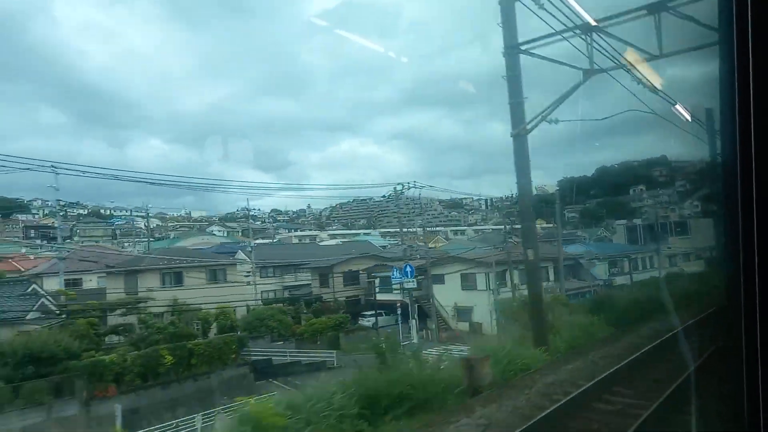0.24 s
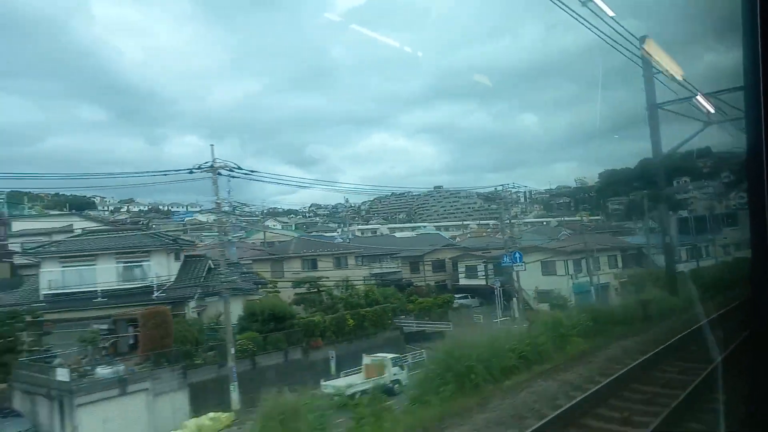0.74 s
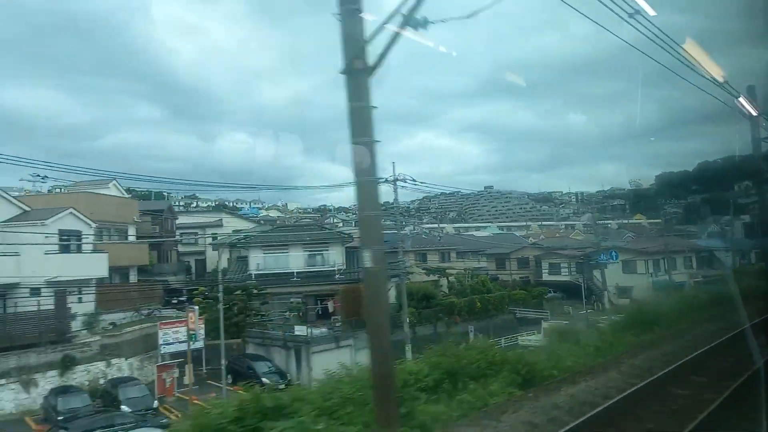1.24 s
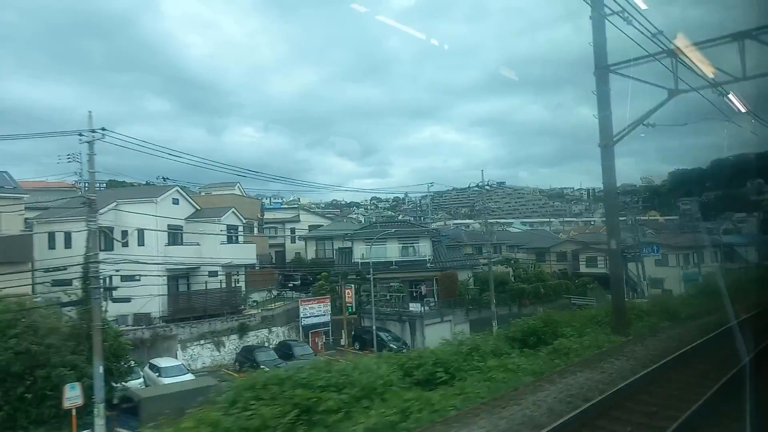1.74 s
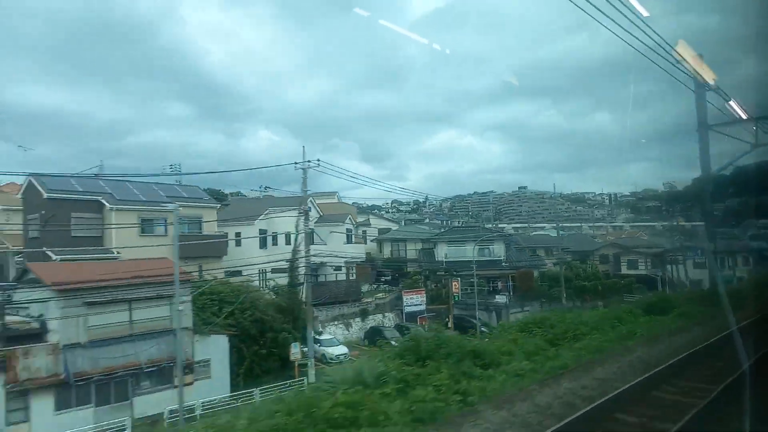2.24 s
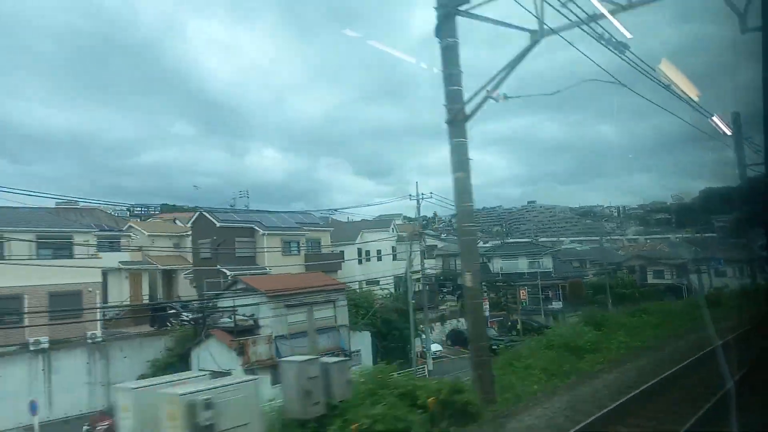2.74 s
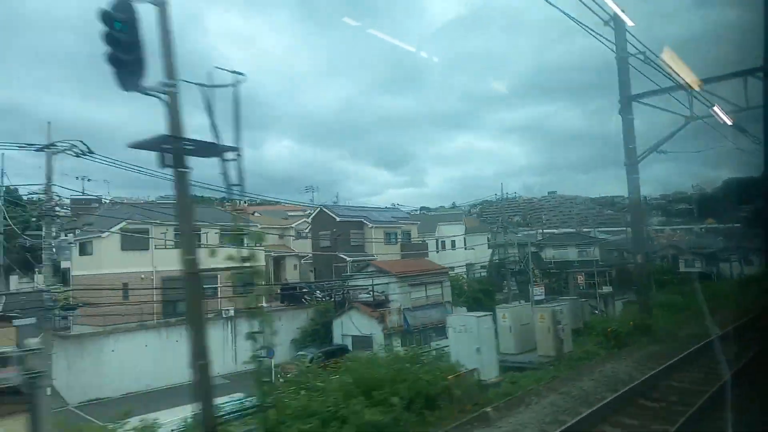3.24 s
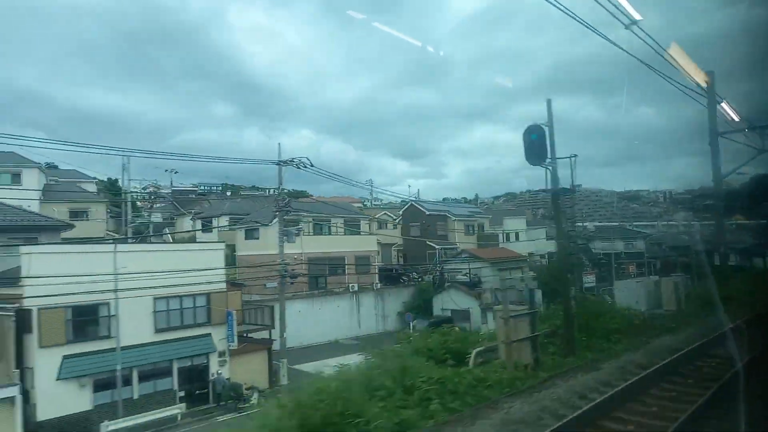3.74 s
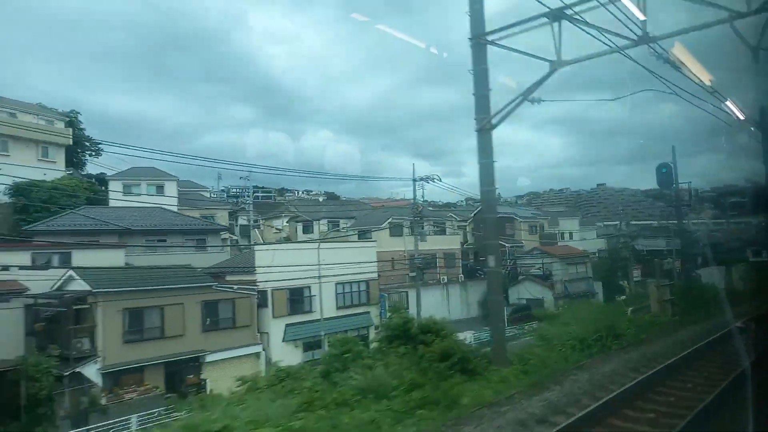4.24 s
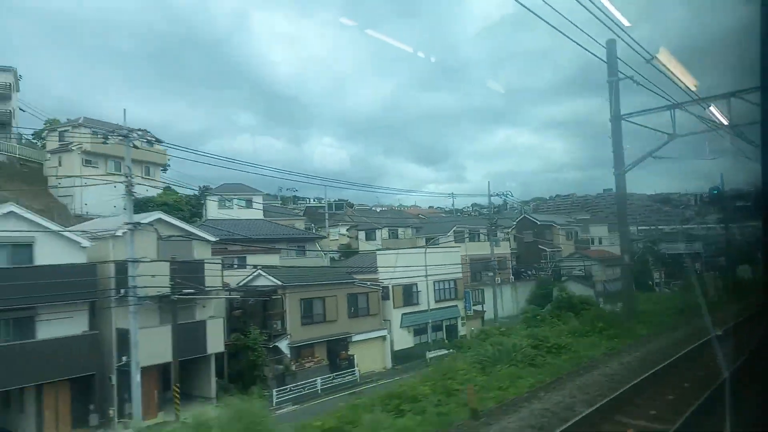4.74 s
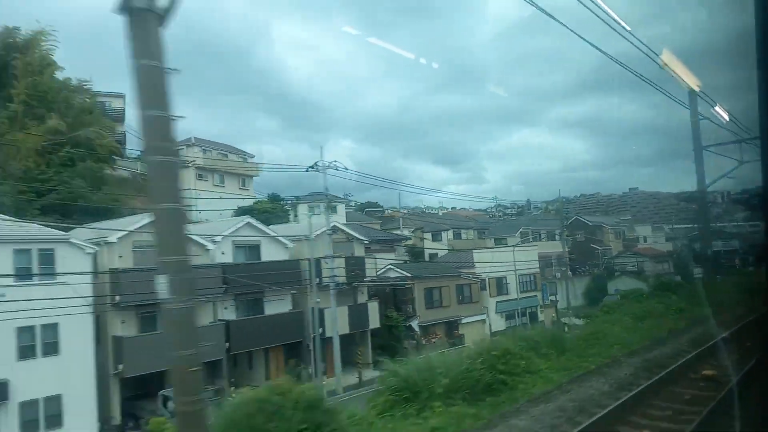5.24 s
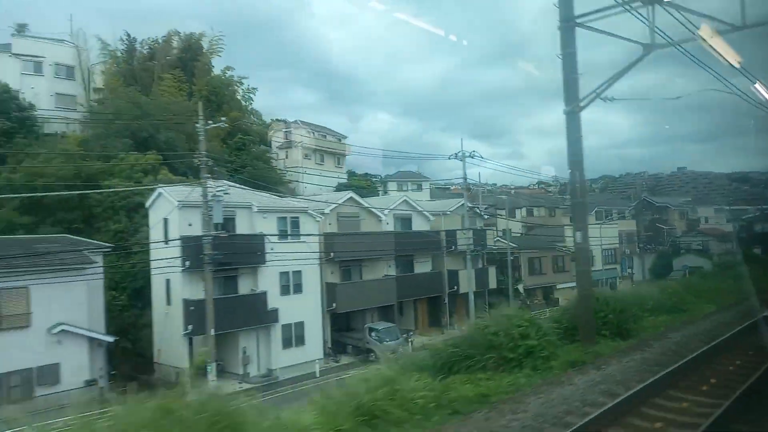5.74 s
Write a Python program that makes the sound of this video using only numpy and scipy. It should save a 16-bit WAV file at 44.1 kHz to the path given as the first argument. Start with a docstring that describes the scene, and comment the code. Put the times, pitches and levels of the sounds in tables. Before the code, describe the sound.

The sound starts almost at once, already inside a running electric train. A loud, low hum wavering in pitch beats against a booming car body, with floor rumble, drumming and droning panels. Frequent small jolts ring single panels; a stiffer panel's drone is strongest just after 1 s. Above this, wheels roar and ring as rolling noise, swelling irregularly on rough rail, notably near 1.3, 2, 2.5 and 3.5 s. Soft air hiss stays in the background. Dull short clunks come from below at about 0.25, 2.2, 2.5, 4 and 4.8 s. Faint gritty scrapes begin after 2 s; around 4.1 and 4.5 s a loose fitting scrapes more clearly, with tiny metallic ticks and rasping falling squeaks. After 5 s the boom drops away markedly, the rolling noise stands out, and a very thin high whine swells about 5.5 to 5.9 s. Enclosed stereo cabin perspective, bass centred, hiss slightly right.

```python
"""Inside a running electric train. From a quick fade-in, filtered noise and a wavering hum make the body boom;
panels drone, the floor rumbles and drums, wheels roar and ring in noise that swells on rough rail, and air
hisses. Jolts ring single panels or knock the floor and dull clunks come from below; a stiffer panel's drone
peaks just after one second. A loose fitting scrapes in gritty noise from two seconds on; around four it also
ticks in decaying modes and squeaks on falling rough tones. Past five seconds the boom eases off and a thin pair
of tones swells up."""
import sys
import numpy as np
from scipy.fft import rfft, irfft, next_fast_len
from scipy.io import wavfile
from scipy.ndimage import uniform_filter1d, minimum_filter1d, map_coordinates

SR = 44100
rng = np.random.default_rng(int(sys.argv[2]) if len(sys.argv) > 2 else 0)


def pcm_store(signal):
    """Save signal as 16-bit PCM."""
    levels = np.round(np.clip(np.atleast_2d(signal), -1, 1) * 32767)
    wavfile.write(sys.argv[1], SR, levels.astype(np.int16).T)


N = 264600  # length (samples)


def amp(db):
    """Decibels to gain."""
    return 10 ** (np.asarray(db) / 20)


def unit(x):
    """Scale to rms 1."""
    return x / np.sqrt(np.mean(x ** 2) + 1e-20)


def seconds():
    """The time of every sample."""
    return np.arange(N) / SR


def along(points, hz):
    """(Hz, value) points read on a log frequency axis."""
    f, v = np.transpose(points)
    return np.interp(np.log(hz + 1), np.log(f + 1), v)


def curve(rows):
    """(s, value) points joined by straight lines, one value per sample."""
    s, values = np.transpose(rows)
    return np.interp(seconds(), s, values)


def wobble(rate):
    """A smooth random curve with rate knots a second."""
    knots = rng.standard_normal(int(N * rate / SR) + 4)
    return map_coordinates(knots, [seconds() * rate])


def swells(rows, half_s):
    """A dB curve with one bell of this half-length (to 1/e) per (s, dB) row."""
    t = seconds()
    return sum(db * np.exp(-((t - s) / half_s) ** 2) for s, db in rows)


def drift(db_per_s):
    """A steady change of level that passes 0 dB halfway through."""
    return db_per_s * (np.arange(N) - N / 2) / SR


def filtered(x, response):
    """x shaped by a response of frequency."""
    m = next_fast_len(N + SR // 2)
    return irfft(rfft(x, m) * response(np.fft.rfftfreq(m, 1 / SR)), m)[..., :N]


def resonances(x, modes):
    """x through parallel (Hz, width Hz, dB) resonances."""
    def response(f):
        return sum(amp(db) * 1j * f * w / (c * c - f * f + 1j * f * w) for c, w, db in modes)
    return filtered(x, response)


# left-right correlation of the cabin noise: pitch_hz, likeness (1 same, 0 unrelated, -1 opposed)
STEREO_LIKENESS = [(60, 0.99), (130, 0.99), (250, 0.97), (400, 0.83), (640, 0.52), (900, 0.23),
                   (1300, -0.49), (2000, 0.061), (3000, -0.043), (6000, -0.0072)]


def cabin_noise(spectrum):
    """Stereo noise of rms 1: long waves reach both sides alike, short ones do not."""
    def mid_side_colour(hz):
        turn = np.arccos(np.clip(along(STEREO_LIKENESS, hz), -1, 1)) / 2
        return amp(along(spectrum, hz)) * [np.cos(turn), np.sin(turn)]
    mid, side = filtered(rng.standard_normal((2, N)), mid_side_colour)
    return unit(np.array([mid + side, mid - side]))


def steady(x, span):
    """Even out the swells of x that last longer than span seconds."""
    width = max(int(span * SR), 2)
    power = np.mean(x ** 2, axis=0)
    power = uniform_filter1d(uniform_filter1d(power, width), width)
    return x / np.sqrt(np.abs(power) + 1e-9)


def tone(hz, wander_hz):
    """A sine of rms 1 whose pitch drifts."""
    cycles = np.cumsum(hz + wander_hz * wobble(6.5)) / SR + rng.random()
    return np.sqrt(2) * np.sin(2 * np.pi * cycles)


def ringing(rows, half_s):
    """One swelling and fading note per (s, dB, Hz) row."""
    t = seconds()
    notes = np.zeros(N)
    for (s, db, hz), phase in zip(rows, rng.random(len(rows))):
        near = np.abs(t - s) < 3 * half_s
        age = t[near] - s
        bell = np.exp(-(age / half_s) ** 2)
        notes[near] += amp(db) * np.sqrt(2) * bell * np.sin(2 * np.pi * (hz * age + phase))
    return notes


# how hard the track shakes the car: time_s, shake_db
SHAKE = [(0, -1.5), (1.2, -2), (1.5, 0.5), (2.2, -1), (3.3, -0.6), (4.4, -4.5), (4.95, -2), (5.4, -7.5),
         (6, -13.5)]
# wavering hum of the running gear: time_s, pitch_hz
HUM_PITCH = [(0, 131.1), (.1, 138.2), (.19, 125.2), (.42, 140.3), (.58, 115.9), (.75, 134.1), (.9, 131),
             (1.16, 120), (1.25, 129.7), (1.42, 124.5), (1.54, 130), (1.75, 128), (2.0, 132.1),
             (2.15, 128.8), (2.62, 128.2), (2.79, 141.7), (2.9, 127.4), (3.0, 131.2), (3.19, 124.1),
             (3.34, 130.8), (3.73, 129), (3.87, 120), (4.0, 130.5), (4.3, 128.7), (4.6, 125.7), (4.9, 130),
             (5.4, 131), (6, 117.8)]
# noise colours of the boom, panels, floor rumble and floor drumming: pitch_hz, density_db (relative, per Hz)
BOOM_COLOUR = [(60, -67), (95, -26.5), (108, -5), (119, 0.5), (130, -5.5), (139, 2.5), (147, -11),
               (155, -6), (168, -22), (190, -36.5), (400, -120)]
PANEL_COLOUR = [(120, -47), (165, -11.5), (188, -11), (213, -0.5), (236, -5.5), (260, -1.5), (272, -8),
                (286, -5.5), (303, -11), (340, -25), (600, -120)]
RUMBLE_COLOUR = [(15, -30.5), (30, -28), (44, -30), (55, -24), (66, -3.5), (80, 7), (94, 4.5), (104, 12.5),
                 (125, -4.5), (350, -120)]
DRUM_COLOUR = [(220, -60.5), (305, -6.5), (340, -1), (378, -4), (420, -9), (460, -12.5), (900, -120)]
# brief surges (+) and dips (-) of the boom: peak_s, change_db
SURGES = [(.2, 3), (.36, 3.5), (.54, -6.5), (.72, 6), (1.24, -4.5), (1.38, -1.5), (1.47, 6.5), (1.59, -8),
          (1.74, 2), (1.83, 4), (1.94, -6.5), (2.76, -13), (2.87, 4.5), (3.12, 4.5), (3.19, -9.5),
          (3.34, 2), (3.43, 3), (3.48, -7.5), (3.74, -14.5), (4.01, 6), (4.07, -25), (4.19, 6.5), (4.28, 8),
          (4.37, -3), (4.48, -0.5), (4.75, -17.5), (4.87, 4), (5.0, -19.5), (5.05, 5.5), (5.1, -12.5),
          (5.31, 4.5), (5.37, -6), (5.6, -9.5), (5.83, -10), (5.93, 4)]
# knocks that swell the drumming: peak_s, rise_db
KNOCKS = [(.05, 5), (1.96, 2.5), (2.1, 3), (2.2, 5), (2.3, 4), (2.77, 4)]
# jolts that each ring a panel, or near 320-375 Hz knock the floor: peak_s, level_db, pitch_hz
JOLTS = [(.15, -18.5, 285), (.27, -15, 240.6), (.4, -21, 245.5), (.49, -17, 223.5), (.54, -22.5, 357.7),
         (.61, -14.5, 226.6), (.79, -24, 373), (1.04, -13.5, 243), (1.14, -18, 254.7), (1.24, -14, 216.4),
         (1.3, -15, 243.5), (1.58, -16, 245.3), (1.7, -15, 236.6), (1.95, -18, 254), (2.42, -11.5, 255.4),
         (2.75, -18.5, 281.4), (3.21, -13, 219), (3.53, -18.5, 235), (3.68, -18.5, 243.8),
         (3.83, -19.5, 234.4), (3.96, -22.5, 337.6), (4.11, -21, 323), (4.24, -16.5, 227.5),
         (4.35, -19.5, 242), (4.5, -18.5, 238.6), (4.58, -18, 213), (4.81, -19, 222.3), (4.96, -21.5, 222),
         (5.08, -20, 228.2), (5.21, -18, 246), (5.52, -23, 225), (5.8, -25.5, 323), (5.88, -22.5, 207.7)]
# slow heaves of the floor: peak_s, level_db, pitch_hz
HEAVES = [(0.7, -19, 93.1), (2.21, -15.5, 96.2), (3.9, -14, 98.6), (4.12, -17.5, 93.3), (4.57, -14, 93.5),
          (4.83, -18, 97), (5.25, -24, 78.65), (5.65, -20, 91), (5.88, -17.5, 82.8)]
# half-length of each bell (s)
SURGE_S, KNOCK_S, JOLT_S, HEAVE_S = 0.025, 0.033, 0.033, 0.042
# base levels, before shake, swells and wavering (dB)
BOOM_DB, PANEL_DB, RUMBLE_DB, DRUM_DB = -10, -20, -22.5, -26
# typical random wavering (dB), and its knots per second
BOOM_WAVER_DB, PANEL_WAVER_DB, RUMBLE_WAVER_DB, DRUM_WAVER_DB, WAVERS_PER_S = 1.0, 1.9, 2.5, 1.33, 19
# how far panels, drumming and hum follow the shake, and the rumble follows the surges (dB per dB)
PANEL_FOLLOW, DRUM_FOLLOW, HUM_FOLLOW, RUMBLE_FOLLOW = 0.34, 0.83, 0.94, 0.2
PANEL_SAG_DB_PER_S = 0.42  # the drumming sags half as fast
# balance of hum at zero shake against noise in the boom, before evening out (dB)
HUM_DB, BOOM_NOISE_DB = -2, -4.0
# the panels' own note: centre and wander (Hz), level against their noise (dB)
PANEL_HUM_HZ, PANEL_WANDER_HZ, PANEL_HUM_DB = 234.2, 9, -4.5
# deepest steady tone of the machinery (Hz, dB)
DEEP_HZ, DEEP_DB = 58.3, -40


def car_body():
    """A wavering hum sounds within the body's boom; panels drone on a wandering note, the floor rumbles and
    drums."""
    def waver(depth_db):
        return depth_db * wobble(WAVERS_PER_S)

    shake_db = curve(SHAKE)
    surge_db = swells(SURGES, SURGE_S)
    sag_db = drift(PANEL_SAG_DB_PER_S)
    boom_db = BOOM_DB + shake_db + surge_db + waver(BOOM_WAVER_DB)
    panel_db = PANEL_DB + PANEL_FOLLOW * shake_db - sag_db + waver(PANEL_WAVER_DB)
    rumble_db = RUMBLE_DB + RUMBLE_FOLLOW * surge_db + waver(RUMBLE_WAVER_DB)
    drum_db = DRUM_DB + DRUM_FOLLOW * shake_db + swells(KNOCKS, KNOCK_S)
    drum_db = drum_db - sag_db / 2 + waver(DRUM_WAVER_DB)

    hum = amp(HUM_DB + HUM_FOLLOW * shake_db) * tone(curve(HUM_PITCH), wander_hz=1.2)
    boom_mix = hum + amp(BOOM_NOISE_DB) * cabin_noise(BOOM_COLOUR)
    boom = amp(boom_db) * steady(boom_mix, span=0.053)
    panel_note = amp(PANEL_HUM_DB) * tone(PANEL_HUM_HZ, PANEL_WANDER_HZ)
    panels = amp(panel_db) * steady(cabin_noise(PANEL_COLOUR) + panel_note, span=0.068)
    rumble = amp(rumble_db) * steady(cabin_noise(RUMBLE_COLOUR), span=0.086)
    drumming = amp(drum_db) * steady(cabin_noise(DRUM_COLOUR), span=0.52)
    notes = ringing(JOLTS, JOLT_S) + ringing(HEAVES, HEAVE_S)
    deep = amp(DEEP_DB) * tone(DEEP_HZ, wander_hz=0.13)
    return boom + panels + rumble + drumming + notes + deep


# drone of a stiffer panel: time_s, level_db
STIFF_LEVEL = [(0, -34.5), (.6, -27), (1.15, -22), (2.1, -26.5), (2.75, -28), (3.2, -35), (6, -41)]
STIFF_HZ, STIFF_WIDTH_HZ = 265.5, 23  # centre, and half-width to 1/e


def stiff_panel():
    """A narrow band of noise drones above the other panels, alike on both sides."""
    def band(hz):
        return np.exp(-((hz - STIFF_HZ) / STIFF_WIDTH_HZ) ** 2)
    drone = filtered(rng.standard_normal((1, N)), band)
    return amp(curve(STIFF_LEVEL)) * steady(drone, span=0.052)


# noise colours of the roar and of the broad wheel ring: pitch_hz, density_db (relative, per Hz)
ROAR_COLOUR = [(220, -48), (400, -3.5), (455, -4.5), (485, 3.5), (512, -2), (535, -0.5), (600, -2.5),
               (780, -3), (980, -7.5), (1130, -6.5), (1300, -14), (1800, -28), (9000, -110)]
RING_COLOUR = [(700, -39), (1200, -4), (1390, 1), (1480, 0), (1620, 4), (1800, -3.5), (2020, -3),
               (2220, -1.5), (2500, -6), (2900, -7), (3400, -14), (6000, -20.5), (8000, -66.5)]
# stretches of rough rail: peak_s, half_length_s, roar_change_db, ring_change_db
ROUGH_RAIL = [(0.038, 0.085, 1.5, 2.5), (0.276, .05, 3.5, 3.5), (0.59, .09, 3, 3), (0.824, 0.13, 1.5, 1),
              (1.05, .05, -0.5, 1), (1.254, 0.14, 4.5, 3.5), (1.57, 0.033, 0.5, 0.5),
              (1.716, .03, -0.5, .5), (1.96, 0.053, 5.5, 4.5), (2.126, .06, 3, 3.5), (2.299, 0.028, 2, 1),
              (2.545, .07, 5.5, 5.5), (2.776, 0.035, 2.5, 5.5), (3.29, 0.034, 3, 2.5), (3.498, .08, 7, 5),
              (3.74, 0.039, 0, 1.3), (4.003, 0.032, 3.5, 1), (4.137, .09, 4, 4), (4.505, .06, 0, 1.3),
              (4.724, 0.1, 3.6, 2.5), (5.836, 0.054, 1.5, 2), (5.965, 0.07, 4, 2.5)]
# narrow wheel resonances: pitch_hz, width_hz, level_db (against the broad ring), singing_share (0-1)
WHEEL_MODES = [(1396, 60, -10.5, .2), (1886, 50, -19, .4), (1994, 61, -12, 0.7), (2100, 91, -14.5, 0.85),
               (2220, 130, -20.5, 0.5), (2960, 90, -23, 0.5), (4720, 110, -32, .1)]
# moments when the resonances sing out or duck: peak_s, change_db
SINGS = [(.87, 5), (.96, 7), (1.16, 8.5), (1.29, 4.5), (1.4, 3), (1.54, 4), (1.99, 4), (2.1, 7.5),
         (2.25, -2), (2.54, 4.5), (3.49, 2), (3.76, 4), (4.68, 1), (5.52, 10), (5.86, 9)]
SING_S = 0.047  # half-length
# rolling noise on smooth rail halfway through (dB), and its slow growth (dB per s)
ROAR_DB, RING_DB, ROLL_RISE_DB_PER_S = -28, -38, 0.36
# typical flutter of roar and ring together, of the roar alone, and of each resonance (dB)
FLUTTER_DB, ROAR_FLUTTER_DB, MODE_WAVER_DB = 0.8, 0.5, 0.8


def wheels():
    """Rolling noise: rails roar and wheels ring, swelling and fluttering with the roughness of the rail."""
    rolling_db = drift(ROLL_RISE_DB_PER_S) + FLUTTER_DB * wobble(60)
    rough_roar_db = sum(swells([(s, roar)], half_s) for s, half_s, roar, _ in ROUGH_RAIL)
    rough_ring_db = sum(swells([(s, ring)], half_s) for s, half_s, _, ring in ROUGH_RAIL)
    roar_db = ROAR_DB + rolling_db + rough_roar_db + ROAR_FLUTTER_DB * wobble(50)
    roar = amp(roar_db) * cabin_noise(ROAR_COLOUR)

    # partly shared noise drives both sides
    drive = rng.standard_normal((2, N)) + amp(-3.0) * rng.standard_normal(N)
    sing_db = swells(SINGS, SING_S)
    modes = np.zeros((2, N))
    for hz, width, db, share in WHEEL_MODES:
        mode = unit(filtered(drive, lambda f: 1 / (1 + (2 * (f - hz) / width) ** 2)))
        modes += amp(db + share * sing_db + MODE_WAVER_DB * wobble(8)) * mode
    ring = amp(RING_DB + rolling_db + rough_ring_db) * (cabin_noise(RING_COLOUR) + modes)
    return roar + ring


# dry clunks under the floor: start_s, level_db
CLUNKS = [(0.246, -17), (1.956, -25.5), (2.191, -17), (2.491, -17.5), (2.721, -25.5), (3.993, -21),
          (4.785, -21)]
# colour of their noise: pitch_hz, density_db (relative, per Hz)
CLUNK_COLOUR = [(250, -20), (500, 8), (800, -1.5), (1300, -1.5), (2200, -17), (4000, -32.5), (8000, -76.5)]
CLUNK_RISE_S, CLUNK_DECAY_S = 0.00097, 0.0042


def clunks():
    """Short dull blows from the bogie: noise with a quick rise and exponential decay."""
    t = seconds()
    blows = np.zeros(N)
    for s, db in CLUNKS:
        age = np.maximum(t - s, 0)
        blows += amp(db) * np.tanh((age / CLUNK_RISE_S) ** 2) * np.exp(-age / CLUNK_DECAY_S)
    return blows * cabin_noise(CLUNK_COLOUR)


def rubbing_stroke(s, rise, decay):
    """The swell of one rub: a bell-shaped rise to its peak at s, then an exponential decay."""
    age = seconds() - s
    return np.exp(-(np.minimum(age, 0) / rise) ** 2 - np.maximum(age, 0) / decay)


# scrapes of a loose fitting: peak_s, level_db, rise_s, decay_s, brightest_hz
SCRAPES = [(2.12, -47.5, 0.026, 0.036, 2600), (3.185, -42, 0.022, .028, 2500), (3.5, -45, 0.04, 0.1, 3600),
           (4.078, -30.5, 0.034, 0.038, 5100), (4.095, -35, 0.035, 0.025, 2600),
           (4.165, -41, 0.02, 0.023, 3400), (4.451, -37.5, 0.007, 0.02, 4600),
           (4.492, -41, 0.02, 0.035, 3600), (4.54, -44, .018, .025, 2000), (5.501, -40, 0.014, .035, 4500)]
# colour of their grit: pitch_hz, density_db (relative, per Hz)
SCRAPE_COLOUR = [(500, -34), (1500, -10.5), (2300, 5.5), (3000, 2.5), (4200, 1), (5300, -1), (6500, -1),
                 (7400, -11), (8400, -28), (15000, -22)]
# modes of the rubbed fitting: pitch_hz, width_hz, gain_db
FITTING_MODES = [(2320, 120, -5), (3690, 46, 1.5), (3910, 60, 5.5), (4340, 46, 3), (4670, 50, 0.5),
                 (5040, 65, 0.5)]


def scrapes():
    """A loose fitting rubs: strokes of grainy noise, with faint high noise, also ring its modes."""
    grain = amp(1.2 * wobble(160))
    grit = grain * cabin_noise(SCRAPE_COLOUR)
    high_noise = amp(-21.5) * grain * cabin_noise(HIGH_COLOUR)
    slips = np.zeros((2, N))
    for s, db, rise, decay, bright_hz in SCRAPES:
        focused = unit(filtered(grit, lambda hz: amp(-6 * np.log2((hz + 1) / bright_hz) ** 2)))
        slips += amp(db) * rubbing_stroke(s, rise, decay) * (focused + high_noise)
    return amp(-1.5) * slips + resonances(slips, FITTING_MODES)


# metallic catches of the fitting: start_s, level_db
TICKS = [(4.036, -38), (4.067, -31), (4.077, -27.5), (4.153, -37), (4.459, -33), (4.489, -34.5),
         (4.535, -39)]
# its modes when caught: pitch_hz, level_db (relative), t60_s (time to fall 60 dB)
TICK_MODES = [(4050, 0, .05), (3700, -4, .06), (4440, -4, 0.055), (4960, -9, .04), (6550, -10, .035)]
TICK_RISE_S = 0.0013


def ticks():
    """Each catch rings the fitting's decaying modes, with different phases on each side."""
    t = np.arange(SR // 5) / SR
    onset = np.tanh((t / TICK_RISE_S) ** 2)
    out = np.zeros((2, N))
    for s, db in TICKS:
        for hz, mode_db, t60 in TICK_MODES:
            ring = np.sin(2 * np.pi * (hz * t + rng.random((2, 1))))
            out[:, round(s * SR):][:, :len(t)] += amp(db + mode_db - 60 * t / t60) * ring * onset
    return out


# rasping squeaks: peak_s, level_db, start_hz, end_hz
SQUEAKS = [(4.093, -34, 2380, 2080), (4.485, -40, 2420, 2030)]
# rise, decay and time for the pitch to fall (s), and typical pitch roughness (Hz)
SQUEAK_RISE_S, SQUEAK_DECAY_S, SQUEAK_FALL_S, SQUEAK_JITTER_HZ = .04, .06, .05, 130


def squeaks():
    """A note with rough pitch and level that falls as the rubbing slows."""
    t = seconds()
    out = np.zeros((2, N))
    for s, db, start_hz, end_hz in SQUEAKS:
        jitter_hz = SQUEAK_JITTER_HZ * np.array([wobble(400), wobble(400)])
        hz = np.interp(t - s, [0, SQUEAK_FALL_S], [start_hz, end_hz]) + jitter_hz
        level = amp(db + 2.9 * wobble(150)) * rubbing_stroke(s, SQUEAK_RISE_S, SQUEAK_DECAY_S)
        out += level * np.sin(2 * np.pi * np.cumsum(hz, axis=1) / SR)
    return out


# the two whine tones: pitch_hz, level_db (before the swell)
WHINE_TONES = [(6496, -61.5), (6540, -58.5)]
# their swell: time_s, change_db
WHINE_SWELL = [(0, -17), (5.2, -20.5), (5.55, 2.5), (5.85, 3), (6, -10)]


def whine():
    """A thin pair of high tones from the running gear, drifting separately on each side."""
    def pair():
        return sum(amp(db + 2.5 * wobble(9.9)) * tone(hz, wander_hz=3.4) for hz, db in WHINE_TONES)
    return amp(curve(WHINE_SWELL)) * np.array([pair(), pair()])


# air along the carriage: time_s, level_db
HISS_LEVEL = [(0, -43.5), (.18, -50.5), (.45, -46.5), (.8, -47.5), (1.6, -50.5), (2.3, -51), (2.7, -47),
              (3.9, -47), (4.7, -45.5), (5.2, -47), (5.5, -42.5), (6, -45)]
# faint noise in the highest band: time_s, level_db
HIGH_LEVEL = [(0, -62), (.17, -66), (.3, -60), (.8, -62), (.95, -66), (1.22, -59.5), (1.45, -70),
              (1.75, -61.5), (2.1, -67), (2.7, -62), (3.0, -63.5), (4.0, -59.5), (4.33, -63), (5.2, -60.5),
              (5.4, -56), (5.95, -60.5)]
# colours of hiss and high noise: pitch_hz, density_db (relative, per Hz); the scrapes share the second
HISS_COLOUR = [(1500, -24), (2800, 0), (3500, -3), (4050, 0), (4400, -3.5), (4780, 3), (5200, -2.5),
               (6550, 1.5), (7000, -5.5), (7400, -18.5), (8200, -49), (12000, -62.5)]
HIGH_COLOUR = [(5000, -49), (7800, -12), (9000, -1), (10500, 1.5), (12500, 1), (13900, -4.5), (15000, 8),
               (15800, -3.5)]


def air():
    """Smooth noise hisses with the air, with faint, uneven high noise on top."""
    hiss = amp(curve(HISS_LEVEL) + 0.94 * wobble(16)) * cabin_noise(HISS_COLOUR)
    high_noise = amp(curve(HIGH_LEVEL) + 1.8 * wobble(17)) * cabin_noise(HIGH_COLOUR)
    return hiss + high_noise


# stereo balance: pitch_hz, left_minus_right_db
STEREO_LEAN = [(60, 1), (110, -0.5), (200, 1.5), (380, 1), (700, 3), (1290, 1.5), (2380, -3), (4400, -2),
               (8120, -8), (15000, -7.5)]
FADE_S = .004  # opening fade-in


def scene():
    """All sources together after a quick fade-in; the roar leans left and the hiss right."""
    body = car_body() + stiff_panel() + wheels() + clunks()
    cabin = body + scrapes() + ticks() + squeaks() + whine() + air()
    opening = np.tanh((seconds() / FADE_S) ** 2)

    def lean(hz):
        half_db = along(STEREO_LEAN, hz) / 2
        return amp(np.array([half_db, -half_db]))
    return filtered(opening * cabin, lean)


CEILING, TOP_HZ = .93, 15830  # limiter ceiling (full scale 1), band limit


def record(dry):
    """A smooth limiter holds the crests under full scale; then everything above the band limit is cut."""
    needed = np.minimum(1, CEILING / (np.abs(dry).max(axis=0) + 1e-9))
    gain = uniform_filter1d(minimum_filter1d(needed, size=900), size=900)
    return filtered(dry * gain, lambda hz: hz < TOP_HZ)


dry = scene()
out = record(dry)
pcm_store(out)
```